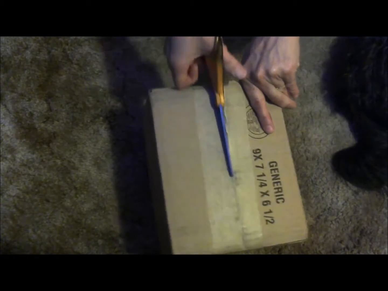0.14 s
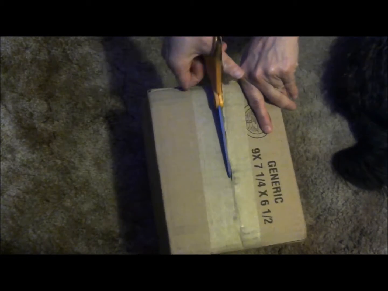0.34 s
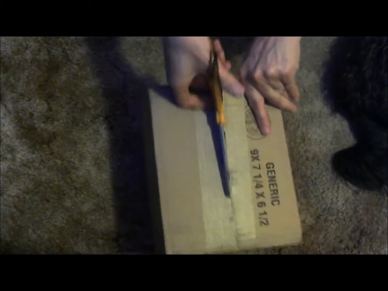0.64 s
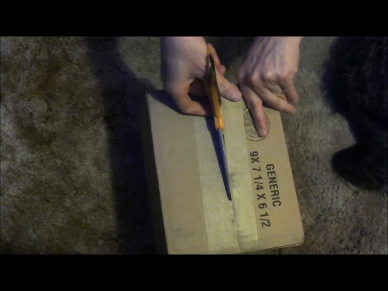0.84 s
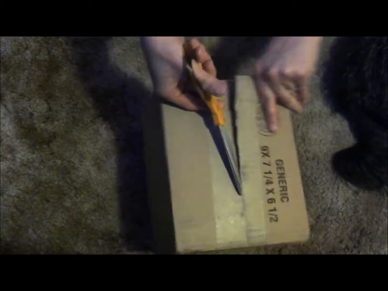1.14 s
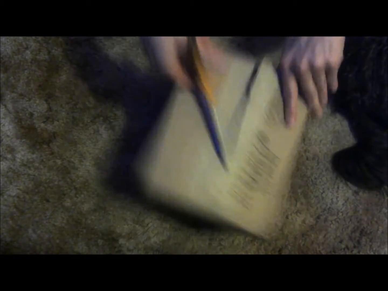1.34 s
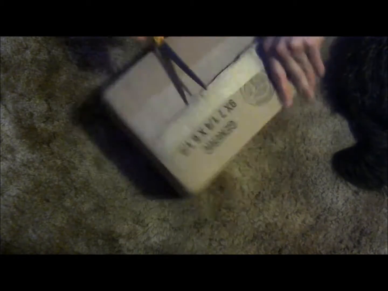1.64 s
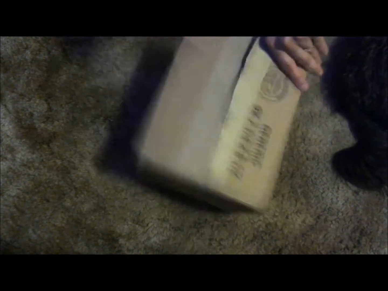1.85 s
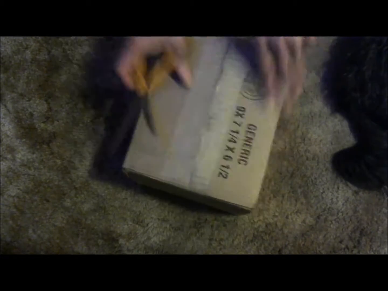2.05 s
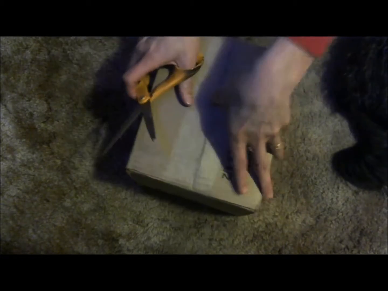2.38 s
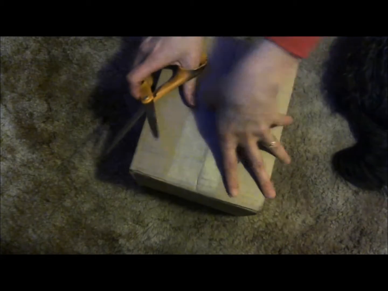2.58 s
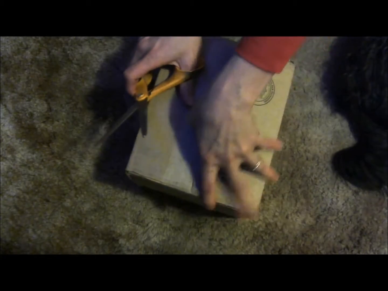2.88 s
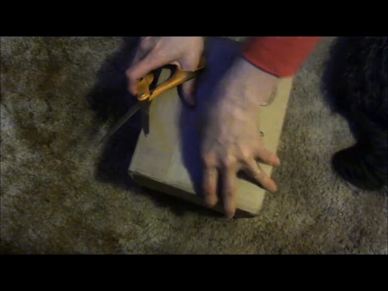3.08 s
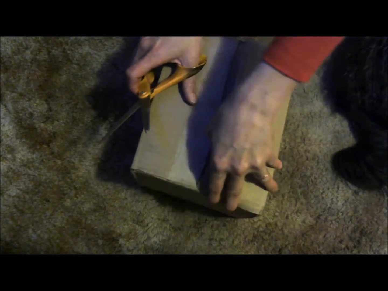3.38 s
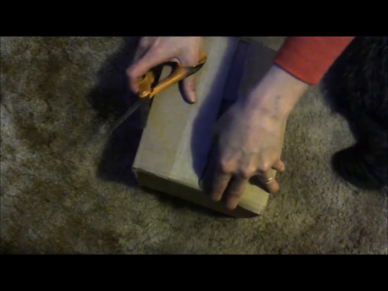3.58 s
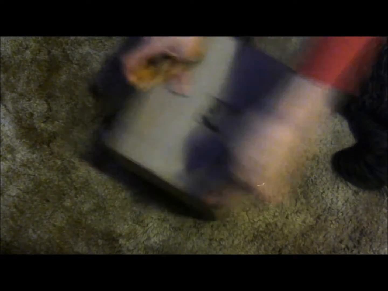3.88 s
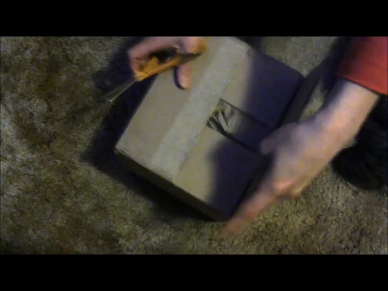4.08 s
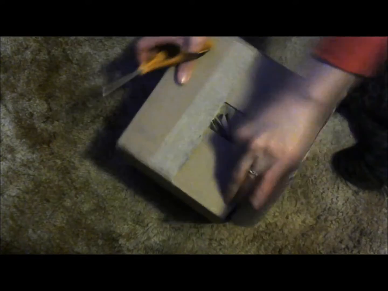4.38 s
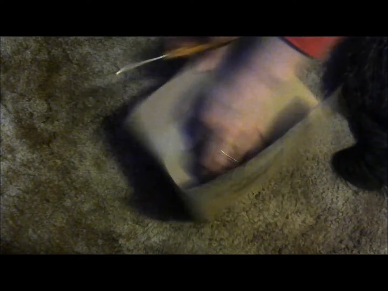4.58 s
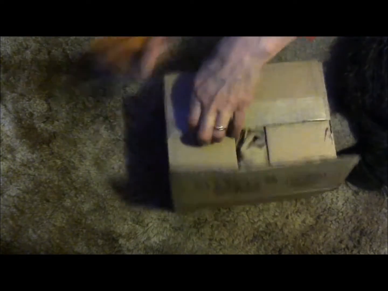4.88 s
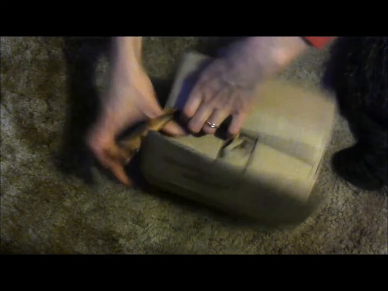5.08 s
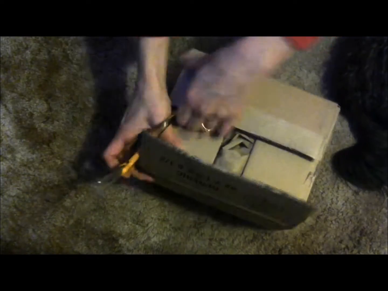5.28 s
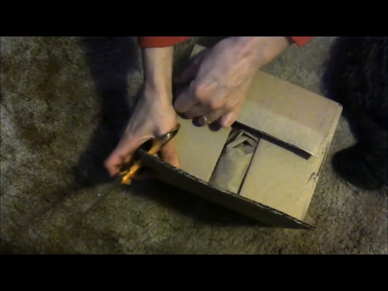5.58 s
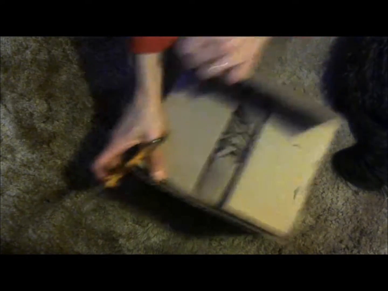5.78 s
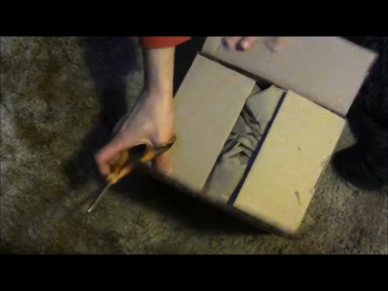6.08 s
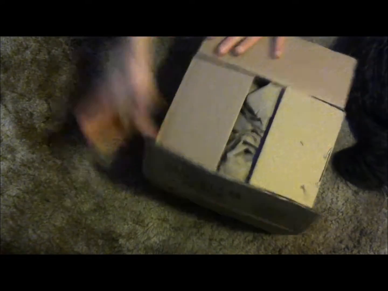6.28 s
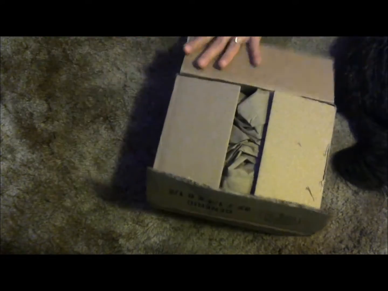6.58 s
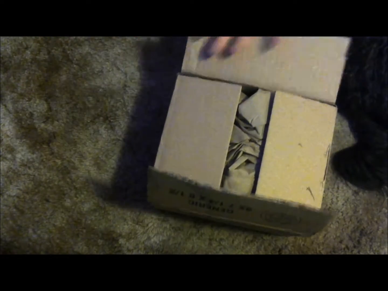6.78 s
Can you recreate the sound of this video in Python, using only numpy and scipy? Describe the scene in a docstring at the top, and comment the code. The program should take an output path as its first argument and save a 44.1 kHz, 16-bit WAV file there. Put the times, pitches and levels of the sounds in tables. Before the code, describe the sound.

Close, crackling tape cuts and tearing on a hollow cardboard box, with soft bumps, scrapes and loud flap pops in a small carpeted room.

```python
"""A small carpeted room, a close microphone: a cardboard box is cut open and its flaps pop free.
Scissors punch and slit the packing tape: sharp noise bursts and dense friction grains.
The box is turned, and a hand rips the last tape in snaps, plucked slips and tearing fibres.
Flaps scrape, creak and pop; blows and shoves ring the panel and air modes of the box.
Sleeves rustle, the room answers, still air hisses, and the microphone clips on the loudest cracks."""
import sys
import numpy as np
from scipy import signal
from scipy.fft import rfft, irfft, next_fast_len
from scipy.io import wavfile
from scipy.ndimage import uniform_filter1d, map_coordinates

SR = 44100
rng = np.random.default_rng(int(sys.argv[2]) if len(sys.argv) > 2 else 0)


def pcm_store(signal):
    """Save signal as 16-bit PCM."""
    levels = np.round(np.clip(np.atleast_2d(signal), -1, 1) * 32767)
    wavfile.write(sys.argv[1], SR, levels.astype(np.int16).T)


N = 306054
HIT = 4096  # samples in an impulse response or a short hit
TOP_HZ = 16500  # upper limit of the microphone
SLIP_RATE, SLIP_SCATTER = 97, 0.68  # median slips a second under a pull; natural-log spread of their pace
SAG_OCTAVES_PER_S = 1.8  # how fast the panel pitch of a shove sinks
CEILING_S, CEILING_DB = .0105, -14  # the ceiling's dull answer: delay and level

# Event levels are relative: each layer adds its own trim.
# tape giving way: start_s, crack_db, panel_ring_db (relative to the crack), decay_s, strongest_band_hz
TAPE_SNAPS = [(0.2388, 1, -3.5, 0.0013, 4000), (0.2865, -5.5, 6.5, 0.0034, 5500),
              (0.2885, -3.5, -15.5, 0.0014, 2900), (0.824, -16.5, -1, 0.0027, 4500),
              (0.866, -15.5, -2, 0.0018, 700), (0.9025, -14.5, -5.5, 0.0013, 3200),
              (2.8647, -16, -21, 0.0018, 3000), (2.9713, 1.5, -12, 0.0023, 4500),
              (2.9741, 3, -12, 0.0027, 3600), (3.004, -0.5, -19, 0.00052, 6500),
              (3.0355, -14.5, -16, 0.0033, 4500), (3.0775, -5.5, -7.5, 0.0018, 4000),
              (3.092, 0, -2.5, 0.0021, 1100), (3.1688, -7.5, -27.5, 0.00083, 3000),
              (3.799, -0.5, -10.5, 0.0016, 4500)]
# short broadband cracks: flap pops, one sharp crack at 2.3 s, the hard edge of a knock at 5.02 s:
# start_s, crack_db, panel_ring_db (relative to the crack), decay_s, strongest_band_hz
SHARP_CRACKS = [(2.2972, -12.5, -22.5, 0.0015, 3500), (4.1495, -18, -20, .0012, 3000),
                (5.021, -13.5, -5.5, .004, 1300), (5.4952, 6, -33.5, 0.0011, 3300),
                (5.6395, 7, -19.5, 0.0018, 3300), (5.6471, 5.5, -19, 0.0012, 3100),
                (5.6504, 0.5, -10.5, 0.002, 1700), (5.8641, -3, -48, 0.0021, 3000)]
# the glue letting go in slips that stand out: start_s, level_db
GLUE_SLIPS = [(3.053, -8.5), (3.1355, -12), (3.1472, -14), (3.1553, -11), (3.178, -11), (3.1923, -11),
              (3.208, -9), (3.222, -12.5), (3.2535, -15), (3.281, -19), (3.2878, -19), (3.3048, -15),
              (3.311, -17), (3.318, -17), (3.323, -16), (3.328, -21), (3.3466, -13.5), (3.4373, -17.5),
              (3.514, -23), (3.542, -19.5), (3.57, -18.5), (3.6035, -14), (3.667, -15), (3.6903, -17),
              (3.6992, -14.5), (3.7132, -19), (3.724, -19), (3.737, -16.5), (3.7481, -17), (3.7627, -19)]
# small hard clicks: scissor blades and tape edges, and a few rustling ticks near 5.8 to 6.0 s: start_s,
# level_db, decay_s, strongest_band_hz
SMALL_CLICKS = [(0.3603, -12.5, 0.0019, 5960), (0.532, -19, 0.0035, 3300), (1.9064, -24.5, 0.0019, 7530),
                (2.904, -12.5, 0.0015, 5050), (4.775, -25, .003, 4700), (5.241, -21, 0.004, 5950),
                (5.415, -8.5, 0.00028, 4500), (5.416, -8, .0015, 4040), (5.256, -28, .001, 5500),
                (5.768, -38, .002, 3500), (5.817, -34.5, .001, 3500), (5.922, -26, .0015, 5030),
                (6.008, -36, 0.0019, 4500), (6.114, -27.5, 0.0037, 4800), (6.344, -21, 0.003, 3015),
                (6.3505, -14.5, 0.0022, 6640)]
# the box bumped by hands and floor: start_s, thud_db, panel_ring_db (relative to the thud), thud_centre_hz
BOX_BUMPS = [(0.24, -25, 14, 173), (1.63, -27.5, 1.5, 240), (1.833, -40, 4, 400), (2.003, -39, -12, 261),
             (2.548, -38.5, -13, 223), (2.972, -14, 3.5, 238), (3.092, -16, 3, 258),
             (3.797, -15, -1.5, 160), (3.855, -18.5, -14, 234), (3.912, -32, -22, 215),
             (3.995, -29, -11, 172), (4.029, -31, -15, 140.4), (4.149, -37, 9, 120), (4.185, -33, -31, 195),
             (4.36, -24, -15, 196), (4.448, -34.5, -3, 164), (4.5996, -19, 5.5, 183),
             (4.644, -42.5, -9.5, 172), (5.019, -13.5, 3, 242), (5.033, -19, -1.5, 280),
             (5.064, -27, -11.5, 203), (5.105, -34, -23.5, 229), (5.216, -31, -10.5, 153),
             (5.648, -12, 6.5, 224), (5.654, -26.5, -19.5, 84), (5.771, -38, 5, 196),
             (5.863, -25.5, -5, 168), (6.033, -31.5, -23, 207), (6.169, -34, 9, 188.6)]
# the box shoved over the carpet: start_s, length_s, panel_db, panel_centre_hz (mid-shove), hollow_db
CARPET_SHOVES = [(0.022, 0.048, -50.5, 345, -59.5), (0.136, 0.017, -41, 710, -62.5),
                 (0.196, 0.13, -32.5, 666.7, -48.5), (0.388, 0.026, -35, 670, -66),
                 (0.441, 0.035, -42, 460, -61), (0.583, 0.09, -54, 360, -53.5),
                 (0.804, 0.097, -36.5, 542, -42.5), (1.405, 0.06, -38.5, 556, -53),
                 (1.526, 0.069, -58, 422, -61.5), (1.959, 0.059, -52, 295, -48),
                 (2.236, 0.028, -41.5, 627, -57.5), (2.385, 0.078, -53.5, 770, -78.5),
                 (2.467, 0.019, -44.5, 560, -62.5), (3.003, 0.055, -36.5, 493, -38.5),
                 (3.799, 0.14, -48.5, 430, -40.5), (4.327, 0.064, -53, 744, -48),
                 (4.678, 0.049, -44, 1000, -69.5), (4.737, 0.066, -35.5, 839, -49),
                 (4.799, 0.094, -43.5, 576, -59), (5.019, 0.041, -38, 475, -39.5),
                 (5.198, 0.084, -53, 810, -57.5), (5.649, 0.025, -28, 450, -34),
                 (5.859, 0.041, -43, 546, -42.5), (6.086, 0.058, -46, 618, -52),
                 (6.67, .05, -55.5, 752, -78), (6.717, 0.043, -40.5, 742, -48.5)]
# a board edge rasping in one narrow band: start_s, length_s, level_db, start_hz, end_hz
EDGE_RASPS = [(0.912, 0.086, -55.5, 2970, 3230), (0.917, 0.056, -61, 2040, 1944),
              (1.116, 0.066, -51, 3900, 4370), (1.156, 0.054, -46.5, 3670, 3000),
              (1.271, 0.045, -55, 2560, 3040), (1.33, 0.096, -52.5, 2974, 2434),
              (1.335, 0.09, -61, 764, 730), (1.785, 0.065, -55, 2660, 2180),
              (4.693, 0.068, -48.5, 5650, 4340), (4.73, 0.057, -42, 1530, 1870),
              (4.884, 0.19, -49.5, 746, 764), (5.226, 0.025, -40, 850, 699),
              (5.377, 0.052, -47, 1677, 1980), (5.724, 0.12, -55.5, 728, 667),
              (6.113, 0.0602, -43.5, 3000, 2900), (6.712, 0.06, -49, 990, 1190)]

# pulls on the tape: start_s, length_s, level_db, swell_db
TAPE_PULLS = [(2.829, 0.034, -45, 20), (2.882, 0.13, -37, -13.5), (2.973, 0.15, -28, -5),
              (3.092, 0.091, -24.5, -8), (3.182, 0.022, -41, -12), (3.281, 0.048, -34.5, -1.5),
              (3.411, 0.034, -47, 3), (3.558, 0.042, -49.5, 15), (3.603, 0.03, -24, 2),
              (3.63, 0.28, -32.5, -7.5), (3.788, 0.094, -20, -12)]
# the scissors biting into the tape: start_s, length_s, level_db, swell_db
SCISSOR_CUTS = [(0.015, 0.049, -53.5, 17), (0.108, 0.05, -41, -1.5), (0.195, 0.13, -36, -0.5),
                (0.38, 0.095, -30, -1.5), (0.815, 0.1, -30.5, -8.5)]
# the blade drawn along the seam: start_s, length_s, level_db, swell_db
BLADE_DRAWS = [(1.145, 0.054, -35, -3), (1.2, 0.27, -47, 5), (1.255, 0.052, -39, -2.5)]
# hands sliding on the box to turn it: start_s, length_s, level_db, swell_db
HAND_TURNS = [(1.783, 0.12, -31.5, -2.5), (2.59, 0.084, -49.5, 11), (2.68, 0.092, -49.5, -9)]
# the first flap brushing past the hand: start_s, length_s, level_db, swell_db
FLAP_BRUSHES = [(3.33, 0.038, -46.5, 1), (3.95, 0.15, -52, 5.5), (4.325, 0.19, -35, -1)]
# fingers scraping on the board: start_s, length_s, level_db, swell_db
FINGER_SCRAPES = [(1.615, 0.029, -45.5, 1.5), (2.133, 0.02, -57, -0.5), (2.215, 0.056, -59.5, 16.5),
                  (2.6, 0.15, -52, -1.5), (4.147, 0.011, -32.5, -3), (4.31, 0.052, -40, 4.5),
                  (4.435, 0.11, -51.5, -0.5), (4.69, 0.096, -49, 3.5), (4.9, 0.024, -42, 4.5),
                  (5.015, 0.022, -24, -6), (5.208, 0.04, -45.5, 17), (5.378, 0.034, -38, -6.5),
                  (5.631, 0.048, -26.5, -4.5), (5.86, 0.031, -23.5, -19), (6.108, 0.059, -48.5, 9.5)]
# sleeves rustling as the arms move: start_s, length_s, level_db, swell_db
SLEEVE_RUSTLES = [(0.0, 0.62, -55, -8), (1.99, 0.61, -64, -6), (3.9, 0.78, -64.5, 9.5),
                  (4.8, 0.78, -65, 12), (5.7, 0.418, -60.5, 6), (6.15, 0.31, -61.5, -4.5)]

# colour of a tape crack: pitch_hz, level_db (per Hz)
SNAP_COLOUR = [(240, -28), (400, -2.5), (931, -2), (1900, -3), (4490, -2.5), (6750, -3), (8650, -8),
               (10000, -15.5), (13000, -30)]
# colour of the short broadband cracks: pitch_hz, level_db (per Hz)
SHARP_COLOUR = [(94, -48.5), (160, -15), (628, -7), (1050, -8.5), (1960, -5), (2240, -7), (3340, -5),
                (4040, -11), (6500, -1), (9330, -21), (15000, -41)]
# colour of a glue slip: pitch_hz, level_db (per Hz)
SLIP_COLOUR = [(180, -54.5), (354, -26), (490, -8), (764, 0), (994, -10), (1400, -14.5), (1850, -3),
               (2490, -19.5), (3070, -1.5), (3840, -10), (4460, -0.5), (5000, -10.5), (6260, -2),
               (7100, -0.5), (8140, -9.5), (10400, -29.5), (16000, -50)]
# colour of tearing fibres: pitch_hz, level_db (per Hz)
TEAR_COLOUR = [(210, -28.5), (350, -10.5), (780, -5), (1000, -5), (1800, -10.5), (2450, -10), (7100, -0.5),
               (9000, -11), (10400, -27), (16000, -41.5)]
# colour of the creaking fold: pitch_hz, level_db (per Hz)
FOLD_COLOUR = [(1500, -22), (2500, -1.5), (4300, 1), (5800, -18)]
# colour of a click: pitch_hz, level_db (per Hz)
CLICK_COLOUR = [(350, -53), (600, -22), (1600, -24), (3040, 4.5), (6120, 5), (8160, 0.5), (10200, -13.5),
                (16000, -34)]
# colour of the scissors cutting: pitch_hz, level_db (per Hz)
CUT_COLOUR = [(590, -31), (1000, -7.5), (1370, -22), (1710, -24), (1790, -5), (2330, -5), (3420, -4.5),
              (7020, 2), (12100, -29), (16000, -61)]
# colour of the blade on the seam: pitch_hz, level_db (per Hz)
BLADE_COLOUR = [(650, -19), (1300, -25), (2580, -7.5), (4170, -16.5), (5080, -3.5), (6980, -1),
                (9270, -11.5), (11200, -31), (15000, -51)]
# colour of hands on the turning box: pitch_hz, level_db (per Hz)
TURN_COLOUR = [(530, -53), (950, -20), (1400, -32), (2450, 4.5), (4960, -11.5), (7150, 4.5), (9040, -8.5),
               (15000, -61)]
# colour of the brushing flap: pitch_hz, level_db (per Hz)
FLAP_COLOUR = [(710, -43.5), (1200, -56), (2000, -30), (3790, -12.5), (4800, -14.5), (7300, 0), (9510, -15),
               (16000, -47)]
# colour of fingers on board: pitch_hz, level_db (per Hz)
FINGER_COLOUR = [(410, -37), (700, -0.5), (1260, -1), (1500, -11), (7010, -4), (11000, -30.5), (16000, -53)]
# colour of the sleeves: pitch_hz, level_db (per Hz)
SLEEVE_COLOUR = [(350, -51), (750, -4.5), (1940, -10), (4300, -6), (6660, -1), (13000, -34)]
# colour of still air: pitch_hz, level_db (per Hz)
AIR_COLOUR = [(24, -40.5), (40, -8.5), (203, -5), (579, -9.5), (956, -16.5), (4200, -23.5), (6770, -17),
              (12000, -32), (15600, -66), (22000, -120)]
# colour of a padded contact: pitch_hz, level_db
SOFT_COLOUR = [(40, -27), (85, -3), (850, -1.5), (1900, -24.5), (6000, -57.5)]

# resonances of the box panels: pitch_hz, width_hz, level_db
PANEL_MODES = [(304, 25, -18.5), (376, 120, -16), (472.2, 36, -3), (553.6, 95, -3), (673.3, 29, 1.5),
               (762.4, 110, 1), (992, 38, -7), (1060, 150, -10), (1285, 11, -15), (1600, 90, -18)]
# resonances of the air in the hollow box: pitch_hz, width_hz, level_db
HOLLOW_MODES = [(80, 25, -17), (140, 72, -7), (195, 38, -2.5), (252, 26, -3), (304, 35, 1.5), (382, 77, -6)]
# resonances of the lifted tape and its flap: pitch_hz, width_hz, level_db
TAPE_MODES = [(818.6, 140, 2), (1140, 54, -3), (1819, 51, -1.5), (2950, 77, -2), (4600, 460, -5.5),
              (6850, 270, -1)]
# resonances of the creaking fold before tension shifts them: pitch_hz, width_hz, level_db
FOLD_MODES = [(2770, 910, 3.5), (3460, 1600, 3), (4240, 560, -3.5)]
# decay of the near room: pitch_hz, t60_s
ROOM_DECAY = [(100, 0.44), (260, 0.26), (700, 0.01), (1840, 0.18), (4850, 0.03), (15000, 0.15)]
# colour of the room's lingering tail: pitch_hz, level_db
TAIL_COLOUR = [(100, -10), (700, -2.5), (1500, -6), (3000, -5.5), (4500, -8), (6900, 6), (8500, -6.5),
               (12000, -26.5)]


def peeling():
    """Each slip plucks the tape, and the lifted strip and its flap ring on."""
    out, attack, release = np.zeros(N), .014, .07  # seconds
    for s, db in GLUE_SLIPS:
        slip = pluck(rng.uniform(3000, 7500), peak_db=6.5)
        add(out, s, amp(db - 5.0) * (.5 * slip + burst(slip, 0.00089, rise=0.0005)))
        strip = ringing(TAPE_MODES, scatter_db=8.0)
        add(out, s, amp(db - 20) * burst(strip, 0.0097, rise=0.0021))
    # under a pull the glue sticks and slips at an uneven pace
    for s, length, db, swell_db in TAPE_PULLS:
        gain = stroke(length, db, swell_db, attack, release)
        size = len(gain)
        turns = np.cumsum(SLIP_RATE * np.exp(SLIP_SCATTER * wobble(90, size))) / SR
        slips = np.diff(np.floor(turns), prepend=0) * amp(2.9 * rng.standard_normal(size))
        plucked = through(slips, pluck(9100, peak_db=6.5))
        add(out, s, amp(-13.5) * gain * unit(plucked))
        strip = through(grains(size, 900, 3), ringing(TAPE_MODES, scatter_db=4.5))
        add(out, s, amp(-11.5) * gain * unit(strip))
    # lesser slips and tearing fibres fill the time between them
    lesser_slips = rub(TAPE_PULLS, SLIP_COLOUR, rate=810, spread_db=1.0, judder_db=4, gain_db=-6.0,
                       attack=attack, release=release)
    fibres = rub(TAPE_PULLS, TEAR_COLOUR, rate=6500, spread_db=0.5, judder_db=2.0, gain_db=-5.0,
                 attack=attack, release=release)
    return out + lesser_slips + fibres


def cracks(table, tone, crack_db, panel_db, crackle_db):
    """Each sharp event cracks in its own band, rings the panels and leaves a short crackle."""
    out, crackle, soft = np.zeros(N), causal(tone), causal(SOFT_COLOUR)
    for s, db, ring_db, length, hz in table:
        panels = through(ringing(PANEL_MODES, scatter_db=5.0), soft)
        add(out, s, amp(db + crack_db) * burst(causal(tone, hz, peak_db=8), length, rise=0.00099))
        add(out, s, amp(db + ring_db + panel_db) * burst(panels, 0.00021, rise=.0003))
        add(out, s, amp(db + crackle_db) * burst(crackle, 0.015, rise=0.0014))
    return out


def creak():
    """Between two pops one flap edge sticks and slips on another; the fold tightens, louder and higher."""
    s, length = 5.515, .123  # seconds
    gain = stroke(length, db=-43.5, swell_db=16, attack=0.038, release=.02)
    turns = np.cumsum(400 * np.exp(.5 * wobble(200, len(gain)))) / SR  # about 400 slips a second
    slips = np.zeros(len(gain))
    for i in np.flatnonzero(np.diff(np.floor(turns))):
        tension = .9 + .14 * i / len(gain) + .06 * rng.normal()
        modes = [(hz * tension, width, db) for hz, width, db in FOLD_MODES]
        fold = ringing(modes, scatter_db=0.5)
        add(slips, i / SR, amp(5.4 * rng.normal()) * unit(through(fold, fold)))
    out = np.zeros(N)
    add(out, s, gain * unit(through(slips, causal(FOLD_COLOUR))))
    return out


def blades():
    """Scissors bite the tape and a blade draws along the seam, each a dense run of friction grains."""
    cuts = rub(SCISSOR_CUTS, CUT_COLOUR, rate=6100, spread_db=0.5, judder_db=3.5, gain_db=-2.5,
               attack=0.01, release=0.035, judder_rate=220, wander_octaves=0.035)
    draws = rub(BLADE_DRAWS, BLADE_COLOUR, rate=6500, spread_db=1.0, judder_db=3.0, gain_db=-0.7,
                attack=0.03, release=0.1, judder_rate=48.0, wander_octaves=0.042)
    return cuts + draws


def clicks():
    """Small hard contacts, too light to move the box."""
    out = np.zeros(N)
    for s, db, length, hz in SMALL_CLICKS:
        tone = causal(CLICK_COLOUR, hz, peak_db=6, peak_octaves=0.21)
        add(out, s, amp(db - 3.5) * burst(tone, length, rise=0.00031))
        add(out, s, amp(db - 18) * burst(tone, .008, rise=0.002))
    return out


def hands_and_flap():
    """Skin and flap slide on board: friction grains under the turning, brushing and scraping strokes."""
    turns = rub(HAND_TURNS, TURN_COLOUR, rate=16000, spread_db=0.5, judder_db=4.5, gain_db=-4.0,
                attack=0.029, release=0.072, wander_octaves=0.069)
    brushes = rub(FLAP_BRUSHES, FLAP_COLOUR, rate=22000, spread_db=5.0, judder_db=5.5, gain_db=-1.5,
                  attack=0.013, release=0.22, judder_rate=60, wander_octaves=0.034)
    scrapes = rub(FINGER_SCRAPES, FINGER_COLOUR, rate=6300, spread_db=0.0, judder_db=0.5, gain_db=-0.5,
                  attack=0.014, release=0.084, wander_octaves=0.16)
    return turns + brushes + scrapes


def rasps():
    """An edge catches in grains that ring the strip of board behind it; the pitch slides and wavers."""
    out = np.zeros(N)
    width_share, waver_octaves = .2, .05
    for s, length, db, start_hz, end_hz in EDGE_RASPS:
        gain = stroke(length, db, 0, attack=0.0067, release=0.044)
        strip = ringing([(start_hz, start_hz * width_share, 0)], 0)
        scrape = through(grains(len(gain), 1200, 1.7), through(strip, strip))
        travel = np.minimum(np.arange(len(gain)) / SR / length, 1)
        octaves = travel * np.log2(end_hz / start_hz) + waver_octaves * wobble(50, len(gain))
        add(out, s, gain * unit(glide(scrape, octaves)))
    return out


def bumps():
    """A soft blow booms the wall it meets at its own pitch, pushes the air in the box and stirs the panels."""
    out, soft, width_share = np.zeros(N), causal(SOFT_COLOUR), .22
    for s, db, ring_db, hz in BOX_BUMPS:
        hollow = unit(ringing(HOLLOW_MODES, scatter_db=5.5))
        wall = unit(ringing([(hz, hz * width_share, 0)], 0)) + amp(-7) * hollow
        push = ringing([(hz, hz * 2.2, 0)], 0)
        boom = through(wall, push)
        add(out, s, amp(db - 4.0) * boom / np.abs(boom).max())
        panels = through(ringing(PANEL_MODES, scatter_db=5.5), soft)
        add(out, s, amp(db + ring_db - 3.5) * burst(panels, 0.00025, rise=0.00043))
    return out


def shoves():
    """A shove on carpet stirs the panel modes nearest a sinking centre, and rocks the hollow in lumps."""
    out, reach, damping = np.zeros(N), .36, 1.5  # reach in natural-log pitch; damping widens the modes
    rings = [ringing([(hz, width * damping, 0)], 0) for hz, width, _ in PANEL_MODES]
    for s, length, panel_db, centre_hz, hollow_db in CARPET_SHOVES:
        gain = stroke(length, 0, 0, attack=0.018, release=.1)
        size = len(gain)
        centre = centre_hz * 2 ** (-SAG_OCTAVES_PER_S * (np.arange(size) / SR - length / 2))
        weights = np.array([np.exp(-np.log(hz / centre) ** 2 / (2 * reach ** 2)) for hz, _, _ in PANEL_MODES])
        murmurs = np.array([unit(through(grains(size, 900, 1.3), through(r, r))) for r in rings])
        panels = (weights * murmurs).sum(axis=0) / np.linalg.norm(weights, axis=0)
        add(out, s, amp(panel_db) * gain * panels)
        lumps = grains(size, 500, 7.8) * amp(1.3 * wobble(30, size))
        hollow = through(ringing(HOLLOW_MODES, scatter_db=5.0), causal(SOFT_COLOUR))
        add(out, s, amp(hollow_db) * gain * unit(through(lumps, hollow)))
    return out


def sleeves():
    """Cloth rustles in dense uneven grains as the arms move."""
    return rub(SLEEVE_RUSTLES, SLEEVE_COLOUR, rate=17000, spread_db=3.5, judder_db=2.0, gain_db=2.5,
               attack=.02, release=0.15, judder_rate=13, wander_octaves=.08)


def room(x):
    """The ceiling and near walls answer early, each pitch with its own decay; a faint bright tail lingers."""
    hz, t, z = signal.stft(rng.standard_normal(SR // 2), SR, nperseg=256)
    decay = amp(-60 * t / along(ROOM_DECAY, hz)[:, None])
    near = signal.istft(z * decay, SR, nperseg=256)[1]
    near = np.pad(near, (round(.007 * SR), 0))
    t = np.arange(SR) / SR
    tail = through(rng.standard_normal(SR) * amp(-60 * t / 1.3), causal(TAIL_COLOUR))  # t60 1.3 s
    ceiling = through(x, np.pad(causal(SOFT_COLOUR), (round(CEILING_S * SR), 0)))
    walls = through(x, near / np.linalg.norm(near))
    lingering = through(x, tail / np.linalg.norm(tail))
    return amp(CEILING_DB) * ceiling + amp(-14) * walls + amp(-36.0) * lingering


def still_air():
    """Steady coloured noise under everything."""
    return amp(-69) * unit(through(rng.standard_normal(N), causal(AIR_COLOUR)))


def rub(strokes, tone, rate, spread_db, judder_db, gain_db, attack, release, judder_rate=110, wander_octaves=.02):
    """Friction: dense grains under strokes whose pressure judders and whose colour wanders."""
    out, response = np.zeros(N), causal(tone)
    for s, length, db, swell_db in strokes:
        gain = stroke(length, db, swell_db, attack, release)
        size = len(gain)
        hiss = through(grains(size, rate, spread_db), response)
        hiss = glide(hiss, wander_octaves * wobble(18, size))
        judder = amp(judder_db * np.tanh(wobble(judder_rate, size)))
        add(out, s, amp(gain_db) * gain * unit(hiss * judder))
    return out


def stroke(length, db, swell_db, attack, release):
    """Gain of one gesture: pressure builds, swells or fades while held, and dies away (release is a t60)."""
    t = np.arange(round((length + release) * SR)) / SR
    rise = np.sin(np.pi / 2 * np.minimum(t / attack, 1)) ** 2
    swell = swell_db * np.minimum(t / length, 1)
    fall = 60 * np.maximum(t - length, 0) / release
    return rise * amp(db + swell - fall)


def grains(size, rate, spread_db):
    """Fibres catching at random moments, rate a second, with uneven force."""
    force = amp(spread_db * np.minimum(rng.standard_normal(size), 2))
    return (rng.random(size) < rate / SR) * force * rng.standard_normal(size)


def pluck(hz, peak_db):
    """The taut tape plucked once; bending waves carry the treble out ahead of the bass."""
    lag_at_1khz, f = .0011, np.fft.rfftfreq(HIT, 1 / SR)  # lag in seconds
    colour = rfft(causal(SLIP_COLOUR, hz, peak_db, peak_octaves=.22))
    y = irfft(colour * np.exp(-4j * np.pi * lag_at_1khz * np.sqrt(1e3 * f)))
    return y / np.abs(y).max()


def burst(response, length, rise):
    """A cluster of fractures that builds and dies, through a response; its loudest 2 ms have rms 1/2."""
    t = np.arange(HIT) / SR
    envelope = (1 - np.exp(-t / rise)) ** 2 * np.exp(-t / length)
    y = through(rng.standard_normal(HIT) * envelope, response)
    return y / (2 * np.sqrt(uniform_filter1d(y * y, SR // 500).max()))


def ringing(modes, scatter_db):
    """Impulse response of damped modes, at new strengths for each place of contact."""
    t = np.arange(HIT) / SR
    out = np.zeros(HIT)
    for k, (hz, width, db) in enumerate(modes):
        strength = (-1) ** k * amp(db + scatter_db * rng.normal()) * width
        out += strength * np.exp(-np.pi * width * t) * np.cos(2 * np.pi * hz * t)
    return out


def causal(spectrum, peak_hz=1000, peak_db=0, peak_octaves=0.35):
    """The quickest (minimum-phase) response with this colour, with one band standing out if asked."""
    hz = np.fft.rfftfreq(HIT, 1 / SR)
    peak = peak_db * np.exp(-(np.log2((hz + 1) / peak_hz) / peak_octaves) ** 2)
    db = along(spectrum, hz) + peak
    # folding the cepstrum forward in time gives minimum phase
    cepstrum = irfft(np.log(np.maximum(amp(db), 1e-6)))
    cepstrum[1:HIT // 2] *= 2
    cepstrum[HIT // 2 + 1:] = 0
    return irfft(np.exp(rfft(cepstrum)))


def glide(x, octaves):
    """Shift all resonances of x along a curve by reading it at a varying speed."""
    return map_coordinates(x, [np.cumsum(2 ** octaves)], order=5, mode="mirror")


def wobble(rate, size):
    """A smooth random curve, rate knots a second."""
    knots = rng.standard_normal(int(size * rate / SR) + 4)
    return map_coordinates(knots, [np.arange(size) * rate / SR])


def through(x, response):
    """x heard through an impulse response."""
    return signal.fftconvolve(x, response)[:len(x)]


def along(points, hz):
    """(Hz, value) points read on a log axis."""
    f, v = np.transpose(points)
    return np.interp(np.log(hz + 1), np.log(f + 1), v)


def amp(db):
    """Decibels to gain."""
    return 10 ** (np.asarray(db) / 20)


def unit(x):
    """Scale to rms 1."""
    return x / np.sqrt(np.mean(x ** 2) + 1e-20)


def add(track, s, sound):
    """Mix a sound in at time s."""
    part = track[max(round(s * SR), 0):][:len(sound)]
    part += sound[:len(part)]


def scene():
    """All the handling close to the microphone, its room and the still air."""
    tape = cracks(TAPE_SNAPS, SNAP_COLOUR, crack_db=-2.0, panel_db=-2.5, crackle_db=-20.5) + peeling()
    sharp = cracks(SHARP_CRACKS, SHARP_COLOUR, crack_db=-6.0, panel_db=-5.5, crackle_db=-28.5)
    contacts = creak() + blades() + clicks() + hands_and_flap() + rasps()
    box = bumps() + shoves()
    close = tape + sharp + contacts + box + sleeves()
    return (close + room(close) + still_air())[None]


def record(dry):
    """The small microphone loses the deep bass, the loudest cracks clip, and the top is cut off."""
    bass_cut = signal.butter(2, 55, "high", fs=SR, output="sos")  # Hz
    clipped = np.clip(signal.sosfilt(bass_cut, dry), -1, 1)
    size = next_fast_len(N + HIT)
    top = 1 / np.sqrt(1 + (np.fft.rfftfreq(size, 1 / SR) / TOP_HZ) ** 120)
    return irfft(rfft(clipped, size) * top, size)[:, :N]


dry = scene()
out = record(dry)
pcm_store(out)
```